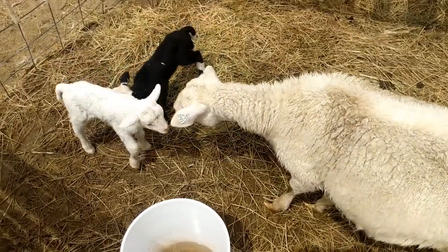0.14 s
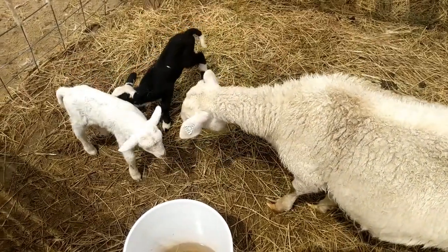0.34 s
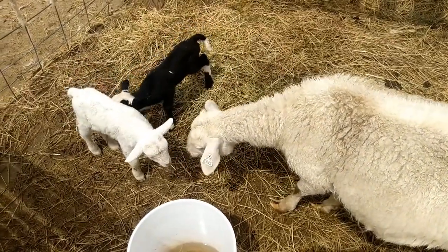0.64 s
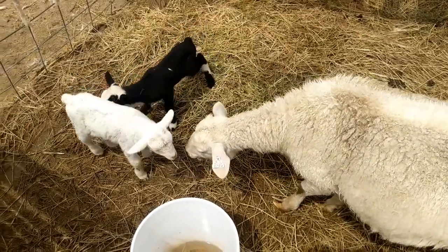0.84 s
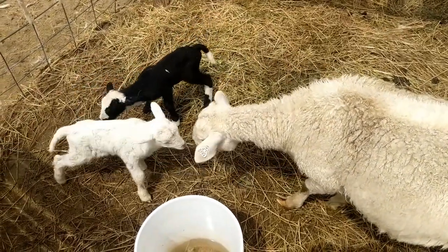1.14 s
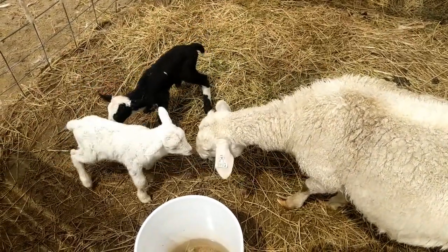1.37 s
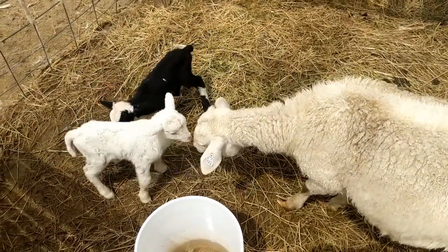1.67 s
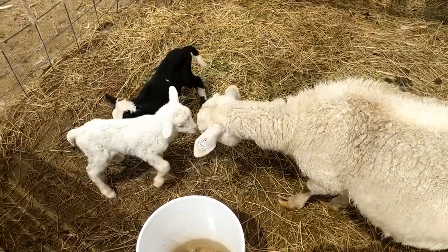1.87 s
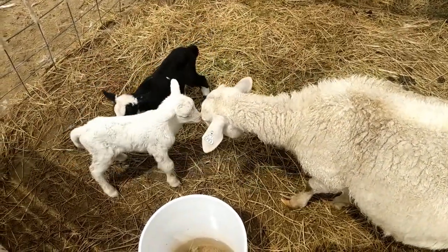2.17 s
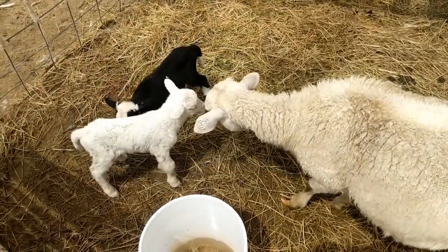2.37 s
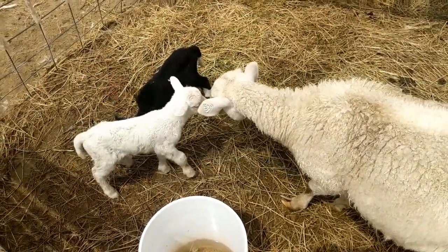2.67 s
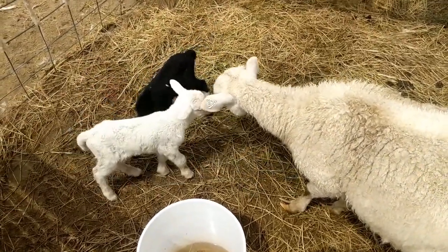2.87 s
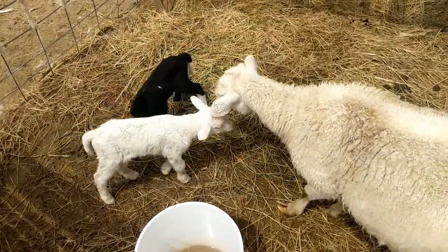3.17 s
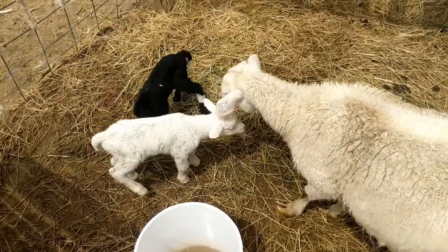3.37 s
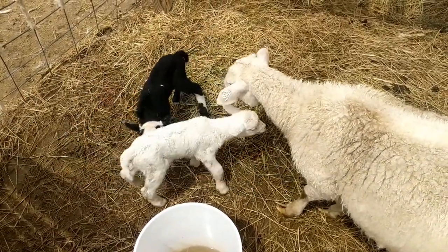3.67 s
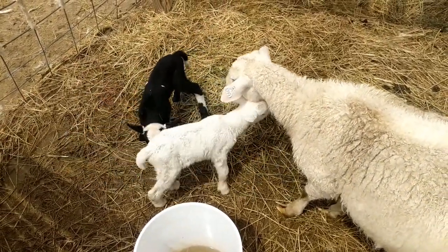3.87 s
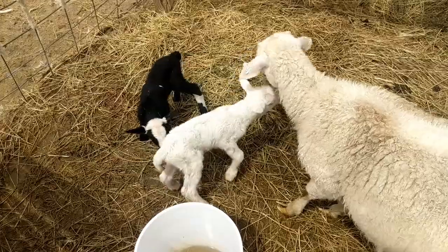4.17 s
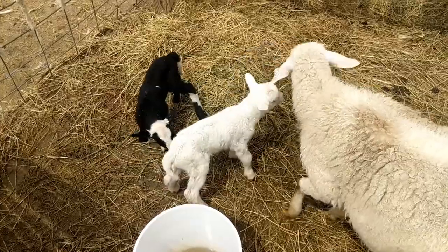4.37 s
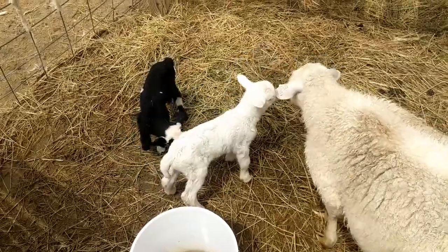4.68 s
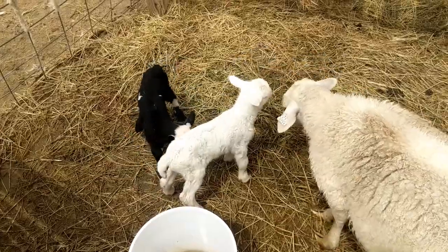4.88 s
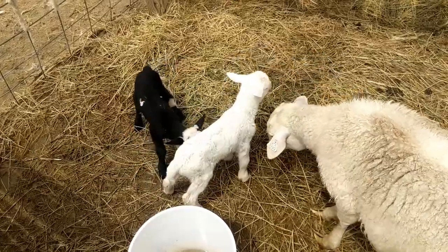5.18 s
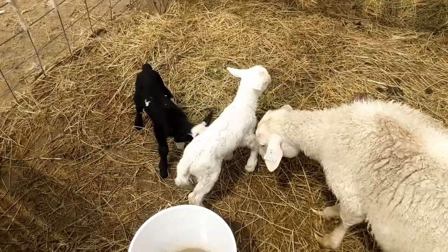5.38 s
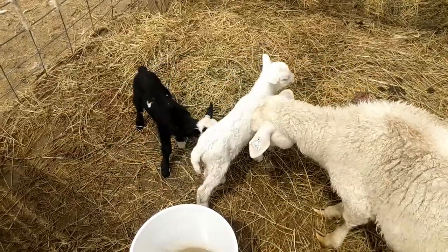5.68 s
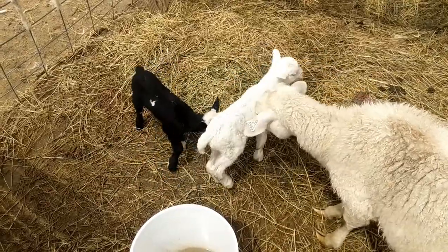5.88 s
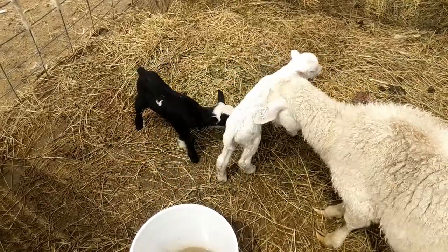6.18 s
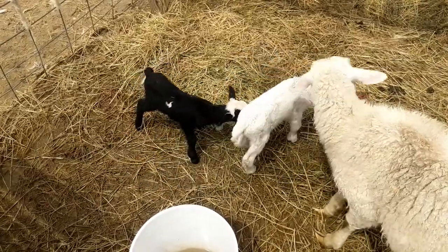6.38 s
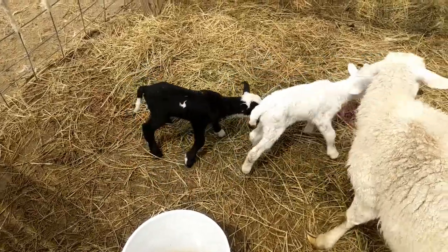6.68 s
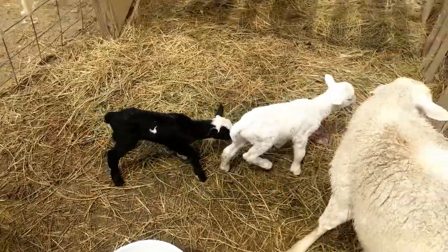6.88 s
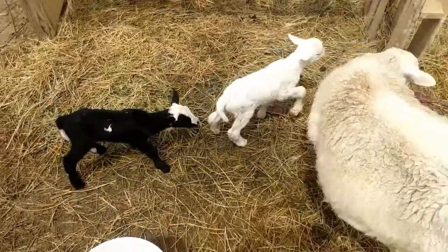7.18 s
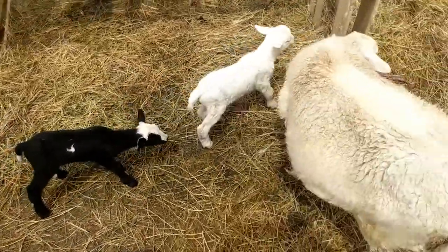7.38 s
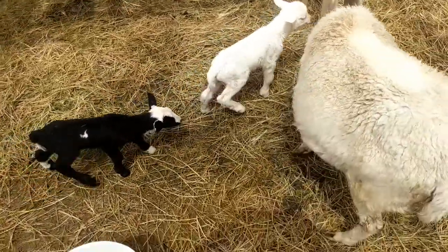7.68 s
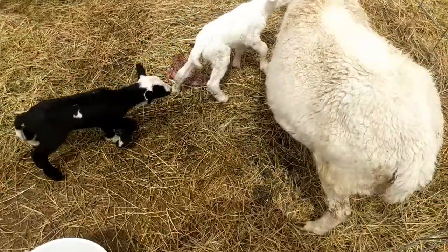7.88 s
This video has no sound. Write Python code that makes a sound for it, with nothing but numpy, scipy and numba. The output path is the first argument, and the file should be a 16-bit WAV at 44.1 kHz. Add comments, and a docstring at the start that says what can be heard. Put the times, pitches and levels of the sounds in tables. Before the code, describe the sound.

Dull wooden bumps and straw snaps, then a hard rattling panel knock, a lamb's thin whine, a ewe's rumble, throbbing bleat and long call.

```python
"""Dull bumps on wood and a faint far bleat, then a pen panel is knocked hard and rattles while straw snaps.
A lamb whines upwards; a ewe rumbles with closed mouth, croaks, gives a throbbing bleat and then a long call.
Wood is ringing modes plus filtered noise; snaps are short noise bursts, a stir and a sniff are noise swells.
Voices are trains of sharp pulses mixed with breath, shaped by the resonances of throat, mouth and nose.
Soft barn air, the fine crackle of bedding and short echoes surround it all."""
import sys
import numpy as np
from scipy import signal
from scipy.fft import rfft, irfft, next_fast_len
from scipy.io import wavfile
from scipy.ndimage import uniform_filter1d
from numba import njit

SR = 44100
rng = np.random.default_rng(int(sys.argv[2]) if len(sys.argv) > 2 else 0)


def generate_wav(signal):
    """Clip the signal to [-1, 1] and save it as 16-bit WAV at the path in sys.argv[1]."""
    frames = np.transpose(np.atleast_2d(signal))
    scaled = np.clip(frames, -1, 1) * 32767
    pcm = np.round(scaled).astype(np.int16)
    wavfile.write(sys.argv[1], SR, pcm)


N = 354123
TIME = np.arange(N) / SR
CUTOFF_HZ = 16000   # top of the voices' harmonics and of the whole sound
WANDER = 0.022   # basic share by which high resonances wander

# tone colour of a dull thud on wood: (frequency [Hz], level [dB])
THUD_COLOUR = [(50, -22), (95, -1.5), (170, 4), (300, 3), (420, -4), (650, -7), (1000, -15.5), (2500, -60)]
# tone colour of wood clattering: (frequency [Hz], level [dB])
CLATTER_COLOUR = [(250, -61), (500, 11), (750, 6.5), (1300, 10), (1800, 0), (2300, -7.5), (3200, -18.5),
                  (7000, -19), (15000, -53)]
# tone colour of a sharp crack, of wood or straw: (frequency [Hz], level [dB])
CRACK_COLOUR = [(1000, 6), (2500, 10.5), (4000, 0), (5300, 4), (7600, 4), (9000, -6), (12000, -4),
                (15500, -16)]


def from_db(db):
    """Turn decibels into a plain multiplier."""
    return 10 ** (np.asarray(db) / 20)


def rms_one(x):
    """Scale a sound to an average strength (rms) of 1."""
    return x / np.sqrt(np.mean(x ** 2) + 1e-20)


def in_time(rows):
    """Draw each column of a table that starts with times as a curve over every sample."""
    times, *columns = np.transpose(rows)
    return [np.interp(TIME, times, column) for column in columns]


def swell(start, end, attack, release, db):
    """A level that rises, holds and falls in straight lines."""
    return from_db(db) * np.clip(np.minimum((TIME - start) / attack, (end - TIME) / release), 0, 1)


def sounding(rows):
    """One while a table of times lasts, with short fades."""
    return swell(rows[0][0] - .01, rows[-1][0] + .01, .01, .01, 0)


def filtered(x, order, hz, kind="low"):
    """Let through only the part below, above or between the given frequencies."""
    return signal.sosfilt(signal.butter(order, hz, kind, fs=SR, output="sos"), x)


def colour(x, spectrum):
    """Filter a sound by a (frequency [Hz], level [dB]) table, then set its rms to 1."""
    hz, db = np.transpose(spectrum)
    size = next_fast_len(N + 4096)
    bins = np.maximum(np.fft.rfftfreq(size, 1 / SR), 1)
    # beyond both ends of the table the level keeps falling
    outside = np.minimum(bins / hz[0], 1) ** 2 * np.minimum(hz[-1] / bins, 1) ** 2
    gain = outside * from_db(np.interp(np.log(bins), np.log(hz), db))
    return rms_one(irfft(rfft(x, size) * gain, size)[:N])


def noise(spectrum):
    """Random hiss with a given tone colour."""
    return colour(rng.standard_normal(N), spectrum)


def drift(rate):
    """A wandering random curve with rms 1 and `rate` new random points a second."""
    points = rng.standard_normal(N // 16)
    return rms_one(np.interp(TIME * rate, np.arange(len(points)), points))


def even(x):
    """Hold the short-term rms near 1, so that a level curve can then shape the sound."""
    power = uniform_filter1d(uniform_filter1d(x * x, size=660), size=660)
    return x / np.sqrt(np.abs(power) + 1e-14)


@njit
def sweep(x, w, r):
    """Two-pole resonance with a moving centre, gain about 1 on top."""
    y = np.zeros(len(x))
    for i in range(2, len(x)):
        drive = (1 - r * r) / 2 * (x[i] - x[i - 2])
        y[i] = drive + 2 * r * np.cos(w[i]) * y[i - 1] - r * r * y[i - 2]
    return y


def resonance(x, hz, width_hz, db=0):
    """A steep-sided resonance: the same pole pair twice."""
    w = 2 * np.pi * hz / SR * np.ones(N)
    r = np.exp(-np.pi * width_hz / SR)
    return from_db(db) * sweep(sweep(x, w, r), w, r)


def resonances(x, modes):
    """Add up fixed resonances, given as (frequency [Hz], width [Hz], level [dB])."""
    return sum(resonance(x, *mode) for mode in modes)


def larynx(pitch, jitter, breath):
    """Vocal folds: one sharp pulse a cycle, uneven in time, with a puff of air in each cycle."""
    phase = 2 * np.pi * np.cumsum(pitch * (1 + jitter * drift(220))) / SR
    harmonics = np.floor(CUTOFF_HZ / np.max(pitch))
    # this ratio of sines adds up equally strong harmonics
    pulses = rms_one(np.sin((harmonics + .5) * phase) / (np.sin(phase / 2) + 1e-12) - 1)
    puffs = rms_one(rng.standard_normal(N) * (1 + np.cos(phase - 1)) ** 2)
    return pulses + breath * puffs


def smeared(x):
    """Scattering close by spreads each pulse over a few milliseconds without colouring it."""
    for delay_s in (.00043, .00077, .00131):
        loop = np.zeros(round(delay_s * SR) + 1)
        loop[0], loop[-1] = 1, -.55
        x = signal.lfilter(loop[::-1], loop, x)
    return x


def throbs(rows, rise, fall, lag=0):
    """Surges of effort (time, dB, optional stretch), each with a rounded top between two flanks."""
    power = 0
    for s, db, *length in rows:
        age = np.clip((TIME - s - lag) / np.prod(length), -.2, .2)
        surge = 2 * from_db(db) / (np.exp(-age / rise) + np.exp(age / fall))
        power = power + surge ** 2
    return np.sqrt(power)


def decays(times, levels_db, t60s, rise=.0004):
    """Level curve of blows that swell at once and die away; t60 is the time to fall by 60 dB."""
    power = np.zeros(N)
    for s, db, t60 in np.broadcast(times, levels_db, t60s):
        at = round(s * SR)
        age = TIME[:min(SR // 2, N - at)]
        power[at:at + len(age)] += (from_db(db - 60 * age / t60) * (1 - np.exp(-age / rise))) ** 2
    return np.sqrt(power)


def ring(times, levels_db, hz, t60):
    """Blows set one mode ringing; a high-pass removes any steady push."""
    clicks = np.full(N, 1e-18)
    clicks[np.round(times * SR).astype(int)] = from_db(levels_db)
    r, w = from_db(-60 / (t60 * SR)), 2 * np.pi * hz / SR
    swing = signal.lfilter([0, np.sin(w)], [1, -2 * r * np.cos(w), r * r], clicks)
    return filtered(swing, 2, hz / 2, "high")


def clacks(times, levels_db, pitches, t60):
    """Short hollow bursts, each at the pitch of the spot that was struck."""
    width_hz = 400
    out, age = np.zeros(N), TIME[:SR // 4]
    for at, db, hz in zip(np.round(times * SR).astype(int), levels_db, pitches):
        band = [max(hz - width_hz / 2, 100), hz + width_hz / 2]
        burst = rms_one(filtered(rng.standard_normal(len(age)), 2, band, "band"))
        out[at:at + len(age)] += burst * from_db(db - 60 * age / t60)
    return out


def background():
    """Low barn air and the fine crackle of trodden bedding, made of random decaying grains of noise."""
    # tone colour of the barn air: (frequency [Hz], level [dB])
    air_colour = [(25, -7), (112, 3), (288, 0.5), (505, -4.5), (1200, -8), (3000, -17), (3900, -19),
                  (6600, -120)]
    # tone colour of the straw bedding: (frequency [Hz], level [dB])
    straw_colour = [(1200, 2), (2800, 1), (4200, 4), (5400, 6.5), (6300, 2.5), (7600, 7), (8600, -1.5),
                    (11000, 0.5), (15800, -3)]
    # how much the animals stir the bedding: (time [s], level [dB])
    stirring = [(0, -63.5), (2.0, -66), (2.6, -68.5), (4.5, -66.5), (6.85, -65), (7.1, -59.5),
                (8.03, -61.5)]
    air_db, grains_per_s, grain_fade_s = -60.5, 50, 0.0053
    straw_db, = in_time(stirring)
    grain_level = from_db(4.5 * np.minimum(rng.exponential(1, N), 2.3))
    grains = (rng.random(N) < grains_per_s / SR) * grain_level
    fading = signal.lfilter([1], [1, -np.exp(-1 / (grain_fade_s * SR))], grains)
    crackle = rms_one(fading) * noise(straw_colour)
    air = noise(air_colour) * from_db(air_db + drift(25))
    return air + from_db(straw_db) * (noise(straw_colour) + crackle * from_db(-4.0))


def barn(x):
    """Scattered reflections, soon soaked up by the hay: fading noise as an echo pattern."""
    t60_s = 0.25
    age = TIME[:SR // 2]
    echoes = rng.standard_normal(len(age)) * from_db(-60 * age / t60_s) * (age > .008)
    return signal.fftconvolve(x, echoes / np.sqrt(np.sum(echoes ** 2)))[:N]


def far_bleat():
    """A faint high bleat from further off: a breathy voice in four evenly spaced quavers."""
    # its tone colour: (frequency [Hz], level [dB])
    far_colour = [(500, 7), (630, 4.5), (1260, -4.5), (1900, -14), (2700, -15), (3700, -7), (5200, -11),
                  (7000, -50)]
    start_s, gap_s, level_db = 1.572, 0.103, -54
    source = larynx(625 * (1 + .025 * drift(25)), jitter=.035, breath=.8)
    quavers = [(start_s + k * gap_s, level_db) for k in range(4)]
    return colour(source, far_colour) * throbs(quavers, rise=0.031, fall=0.0075)


def soft_noises():
    """A faint far-off stir, a rustle and a breathy sniff: swells of flickering noise."""
    # first the stir, then the rustle, then the sniff:
    # (start [s], end [s], attack [s], release [s], level [dB])
    swells = [(1.3, 2.5, 0.76, 0.33, -62), (5.949, 6.63, 0.021, 0.13, -51.5),
              (6.608, 6.804, 0.096, 0.12, -46)]
    # tone colour they share: (frequency [Hz], level [dB])
    soft_colour = [(150, -35), (250, -5), (359, -3.5), (1070, -6.5), (1850, -2.5), (2620, -11), (7380, -10),
                   (8770, -21.5), (15500, -22.5)]
    flicker = from_db(2 * drift(330) + 2 * drift(60))
    return noise(soft_colour) * sum(swell(*row) for row in swells) * flicker


def snaps():
    """Bright splintering bursts of noise: straw stalks snap, and one sharp crack comes as the panel rattles."""
    # snapping stalks, and at 3.725 s the sharp crack as the panel rattles:
    # (time [s], level [dB], pitch that sets the band [Hz], length [s])
    snap_rows = [(0.055, -20.5, 3700, 0.008), (0.389, -23.5, 7100, 0.03), (1.089, -33.5, 6040, 0.064),
                 (1.1233, -14.5, 8500, 0.039), (1.15, -19, 7600, 0.021), (1.2426, -32.5, 6740, 0.084),
                 (1.526, -31.5, 5270, 0.054), (2.924, -14.5, 6950, 0.03), (3.725, -25.5, 5830, 0.064),
                 (4.026, -29.5, 5370, 0.061), (4.094, -38, 5440, 0.049), (4.549, -28, 4330, 0.018),
                 (4.925, -27.5, 7540, 0.019), (5.996, -31, 6700, 0.022), (6.448, -25, 6760, 0.077),
                 (6.589, -27, 6800, 0.029), (6.713, -24.5, 7000, 0.035), (7.072, -35, 2060, 0.017),
                 (7.2031, -20.5, 6400, 0.0056), (7.262, -33, 7050, 0.14), (7.351, -33.5, 4370, 0.11),
                 (7.857, -20.5, 7380, 0.02)]
    s, snap_db, pitches, lengths = np.transpose(snap_rows)
    splinters = noise(CRACK_COLOUR) * from_db(2 * drift(2500))
    out = np.zeros(N)
    for at, db, hz, length in zip(np.round(s * SR).astype(int), snap_db, pitches, lengths):
        age = TIME[:min(SR // 4, N - at)]
        envelope = from_db(db - 4 - 60 * age / length) * (1 - np.exp(-age / (0.068 * length)))
        burst = splinters[at:at + len(age)] * envelope
        out[at:at + len(age)] += filtered(burst, 2, [hz * 0.91, min(hz * 1.8, 15000)], "band")
    return out


def bounces(count):
    """After the hardest bump the board bounces evenly, each time more weakly; rows like the bumps."""
    start_s, gap_s, t60_s = 1.322, 0.05, 0.18
    thud_db, thud_loss_db, clatter_db, clatter_loss_db = -30.5, 8.5, -35.5, 5
    return [(start_s + k * gap_s, thud_db - k * thud_loss_db, clatter_db - k * clatter_loss_db, t60_s)
            for k in range(count)]


def bumps():
    """Knocks ring a board's modes and make dull noise; light taps, soft footfalls and scuffs join in."""
    # dull bumps on wood: (time [s], thud level [dB], clatter level [dB], thud decay by 60 dB [s])
    bump_rows = [(0.052, -49.5, -54, 0.05), (0.535, -49, -65, 0.071), (0.657, -47.5, -68, 0.23),
                 (0.745, -42, -50, 0.11), (0.793, -53, -47.5, 0.13), (0.828, -47, -54, 0.068),
                 (0.911, -43, -60, 0.036), (0.995, -58, -53, 0.074), (1.293, -22, -37, 0.066),
                 (1.298, -26, -36, 0.3), (1.718, -35.5, -41, 0.16), (2.676, -47, -51, 0.032),
                 (3.396, -52, -44, 0.2), (4.265, -55.5, -53, 0.18)]
    # modes of the knocked board: (frequency [Hz], level [dB], decay by 60 dB [s])
    board_modes = [(88.7, -18.5, 0.6), (147, 4, 0.069), (256.6, -2.5, 0.21), (305, 6, 0.062),
                   (375.5, -7, 0.24), (513, -9.5, 0.14), (630, -19, 0.026)]
    # soft footfalls: (time [s], level [dB])
    footfalls = [(2.274, -33), (2.3, -34)]
    # a body scuffing along the panel: (start [s], end [s], attack [s], release [s], level [dB])
    scuffs = [(0.394, 0.604, 0.12, 0.072, -49), (0.554, 0.796, 0.077, 0.03, -51.5),
              (0.781, 0.971, 0.012, 0.056, -47), (3.247, 4.11, 0.44, 0.38, -47)]
    # tone colour of the scuffing: (frequency [Hz], level [dB])
    scuff_colour = [(60, -48), (103, 10.5), (173, -6), (356, 3), (445, -15), (572, 1.5), (691, -14),
                    (809, -9.5), (933, -13), (1590, -12.5), (1930, -23), (2600, -26), (3380, -57)]
    # light hollow taps on the pen: (time [s], level [dB], pitch [Hz])
    taps = [(0.619, -54, 1600), (0.748, -38.5, 644), (0.911, -44.5, 600), (0.995, -46.5, 1360),
            (3.535, -41, 1180), (3.936, -48, 1530), (3.958, -46, 1090), (4.267, -53, 1010),
            (4.382, -57, 2000)]
    s, thud_db, clatter_db, t60 = np.transpose(list(bump_rows) + bounces(count=5))
    # neighbouring modes start in opposite directions
    board = sum((-1) ** k * ring(s, thud_db + db - 2.0, hz, decay)
                for k, (hz, db, decay) in enumerate(board_modes))
    thud = noise(THUD_COLOUR) * decays(s, thud_db - 4.0, t60)
    clatter = noise(CLATTER_COLOUR) * decays(s, clatter_db + 3.5, t60 * 0.63)
    step_s, step_db = np.transpose(footfalls)
    steps = resonance(ring(step_s, step_db, 96.5, 0.33), 112, 120)
    scuff = noise(scuff_colour) * sum(swell(*row) for row in scuffs) * from_db(2.2 * drift(80))
    return board + thud + clatter + steps + scuff + clacks(*np.transpose(taps), t60=0.066)


def panel():
    """The panel booms in its modes and clatters against its fastening until held; hard blows crack."""
    # a nudge, then the knock with its rattle:
    # (time [s], boom level [dB], clatter level [dB], pitch of the clack [Hz])
    bangs = [(3.497, -25, -34.5, 1230), (3.628, -15, -20, 1160), (3.638, -21.5, -21, 790),
             (3.648, -41, -29, 950), (3.697, -25, -26, 1430), (3.724, -24, -29, 1670),
             (3.754, -24, -30, 1350), (3.802, -24.5, -35, 740), (3.827, -30.5, -35.5, 686),
             (3.863, -25.5, -36.5, 1020)]
    # modes of the panel: (frequency [Hz], level [dB], decay by 60 dB [s])
    panel_modes = [(124.46, 3.5, 0.84), (181.2, -1, 0.85), (279, -3, 0.12), (369, -4, 0.42),
                   (519, -1, 0.28), (637, -22, 0.41), (753, -0.5, 0.11), (1013, -11, 0.35),
                   (1160, -12, 0.32), (1300, -18, 0.15)]
    crack_below_db = -17   # crack against the strongest clatter, before the trims below
    crack_growth = 0.77   # dB of crack per dB of clatter
    s, boom_db, clatter_db, clack_hz = np.transpose(bangs)
    strongest_db = clatter_db.max()
    crack_db = strongest_db + crack_below_db + crack_growth * (clatter_db - strongest_db)
    # every blow excites each mode by a different random amount
    boom = sum(ring(s, boom_db + db - 12.5 + rng.normal(0, 4.1, len(s)), hz, t60)
               for hz, db, t60 in panel_modes)
    thud = noise(THUD_COLOUR) * decays(s, boom_db - 2.0, 0.11)
    clatter = noise(CLATTER_COLOUR) * decays(s, clatter_db - 2.5, 0.17) * from_db(3.3 * drift(350))
    crack = noise(CRACK_COLOUR) * (decays(s, crack_db - 1.5, 0.043) + decays(s, crack_db - 9.0, 0.33))
    clack = clacks(s, clatter_db - 6.5, clack_hz, t60=0.13)
    # a thin panel radiates little below its lowest mode
    body = filtered(boom + thud + clatter + clack, 4, 90, "high")
    held_db = np.interp(TIME, [3.87, 3.96], [0, -14])
    return body * from_db(held_db) + crack


def whine():
    """A lamb's thin note glides steadily up: first mostly a hum, then more overtones through the nose."""
    # strength of the whine: (time [s], hum level [dB], overtone level [dB])
    strength = [(4.73, -65, -74), (4.81, -56, -69), (4.88, -52.5, -61), (4.915, -59, -62),
                (5.0, -56.5, -59), (5.05, -58, -64), (5.2, -61, -65)]
    # fixed resonances of the lamb's nose: (frequency [Hz], width [Hz], level [dB])
    lamb_nose = [(560, 250, -12), (900, 200, -4), (1330, 300, -7)]
    start_s, end_s, start_hz, rise_hz_per_s = 4.73, 5.2, 193, 425
    pitch = start_hz + rise_hz_per_s * (np.clip(TIME, start_s, end_s) - start_s)
    source = larynx(pitch, jitter=.014, breath=.12)
    hum_db, overtones_db = in_time(strength)
    hum = even(resonance(source, pitch, 120)) * from_db(hum_db)
    nose = even(resonances(source, lamb_nose)) * from_db(overtones_db)
    return (hum + nose) * from_db(1.5 * drift(45)) * sounding(strength)


def rumble():
    """The ewe's closed-mouth call: uneven throbs sound the nose, over a held tone, a creak and a rasp."""
    # voice of the rumble: (time [s], pitch [Hz], creak level [dB])
    rumble_voice = [(5.145, 80.03, -58), (5.165, 85.9, -59), (5.235, 90.6, -55), (5.285, 95, -63),
                    (5.34, 104.8, -57), (5.39, 150.4, -62), (5.551, 160.1, -58), (5.64, 160.2, -60),
                    (5.72, 118.2, -59), (5.751, 89.6, -74)]
    # its surges of effort: (time [s], level [dB])
    surges = [(5.235, -42.5), (5.259, -51), (5.305, -39.5), (5.334, -45.5), (5.37, -44.5), (5.428, -43),
              (5.484, -44), (5.54, -48.5), (5.575, -51), (5.627, -52), (5.688, -49.5), (5.712, -43)]
    # fixed resonances of the ewe's nose: (frequency [Hz], width [Hz], level [dB])
    ewe_nose = [(200, 150, 1), (310, 120, -3), (620, 300, -16), (1050, 140, -3.5)]
    # resonances of the rasp: (frequency [Hz], width [Hz], level [dB])
    rasp_modes = [(5550, 390, -6), (6190, 340, 1), (7500, 1000, -9)]
    start_s, end_s, tone_db, rasp_db = 5.234, 5.755, -56.5, -58
    creak_hz, creak_sag_hz_per_s2 = 2410, 1700   # the creak's resonance sinks ever faster
    sink_hz, sink_hz_per_s = 1950, 700   # the one below it sinks steadily
    quavers_per_s, quaver_peak_s, quaver_swing_db = 16.5, 5.478, 4
    pitch, creak_db = in_time(rumble_voice)
    first_s, last_s = rumble_voice[0][0], rumble_voice[-1][0]
    age = np.clip(TIME, first_s, last_s) - first_s
    jitter = np.interp(pitch, [85, 160], [.24, .2])
    breath = np.interp(pitch, [90, 150], [.1, .45])
    pulses = larynx(pitch, jitter, breath)
    source = smeared(pulses)
    tone = swell(start_s, end_s, .05, .03, tone_db) * from_db(3 * drift(90))
    effort = np.hypot(throbs(surges, rise=0.006, fall=0.0065), tone)
    nose = even(resonances(source, ewe_nose)) * effort
    # the upper resonances quaver in level
    quaver = np.cos(2 * np.pi * quavers_per_s * (TIME - quaver_peak_s) + .4 * drift(8))
    flutter = from_db(quaver_swing_db * quaver)
    sinking_hz = (sink_hz - sink_hz_per_s * age) * (1 + WANDER * drift(40))
    sinking_level = np.hypot(effort * from_db(-9), flutter * swell(5.34, 5.69, 0.06, 0.034, -58.5))
    sinking = even(resonance(source, sinking_hz, 310)) * sinking_level
    hum = even(resonance(source, 237.0, 59)) * tone * from_db(-5.0)
    hum = hum + even(resonance(source, 156, 87)) * effort * from_db(-12.5)
    # the creak catches once, sharply
    catch = throbs([(5.259, -48)], rise=0.0017, fall=0.003)
    creak_level = from_db(creak_db + 3.5 * drift(80)) * np.sqrt(flutter) + catch
    creak = even(resonance(pulses, creak_hz - creak_sag_hz_per_s2 * age ** 2, 450)) * creak_level
    low = filtered(nose + sinking + hum + creak * sounding(rumble_voice), 8, 2800)
    rasp = even(sum(resonance(pulses, hz * (1 + WANDER / 2 * drift(30)), width, db)
                    for hz, width, db in rasp_modes))
    return low + rasp * flutter * swell(first_s, end_s, 0.35, 0.19, rasp_db)


def croak():
    """A few dry, hollow rattles deep in the throat; the main resonance moves from one to the next."""
    # rattles that end the rumble: (time [s], level [dB], main resonance [Hz])
    rattles = [(5.781, -44.5, 1600), (5.798, -44, 1340), (5.827, -42.5, 1560), (5.852, -39.5, 1246),
               (5.884, -48.5, 1350)]
    # fixed resonances of the throat: (frequency [Hz], width [Hz], level [dB])
    throat_modes = [(243, 123, 3), (537, 134, -5.5), (875, 220, -5), (1630, 120, -5), (1856, 370, -10)]
    s, db, hz = np.transpose(rattles)
    source = smeared(larynx(133.5, jitter=.12, breath=.5))
    main = resonance(source, np.interp(TIME, s, hz), 280, db=2)
    # the signs alternate from one resonance to the next
    others = sum((-1) ** k * resonance(source, *mode) for k, mode in enumerate(throat_modes))
    return even(main + others) * throbs(zip(s, db), rise=0.003, fall=0.0066)


def slides(source):
    """Short swells of the bleat's top resonance, most of them sliding down in pitch."""
    # the slides: (start [s], starting frequency [Hz], level [dB])
    slide_rows = [(6.045, 3230, -47), (6.11, 2880, -43), (6.174, 2690, -40), (6.245, 2500, -44),
                  (6.385, 3116, -48)]
    length_s, end_hz, width_hz = 0.06, 2500, 260
    s, start_hz, db = np.transpose(slide_rows)
    latest = np.maximum(np.searchsorted(s, TIME) - 1, 0)
    progress = np.clip(TIME - s[latest], 0, length_s) / length_s
    hz = end_hz + (start_hz[latest] - end_hz) * (1 - progress)
    level = from_db(db[latest]) * np.sqrt(np.abs(np.sin(np.pi * progress)))
    return even(resonance(source, hz, width_hz)) * level


def bleat():
    """The mouth opens and closes over a voice that starts as a rasp and surges in uneven throbs."""
    # voice and mouth: (time [s], pitch before bending [Hz], mouth opening [0-1])
    bleat_voice = [(6.005, 135, 0.34), (6.07, 130, 0.69), (6.16, 132.5, 0.82), (6.295, 143.9, 0.95),
                   (6.436, 129.5, 0.77), (6.49, 109, 0.08)]
    # three mouth resonances before the shifts below: (frequency shut [Hz], frequency open [Hz])
    mouth_range = [(320, 613), (1520, 1844), (2150, 2083)]
    # throbs: (time [s], upper resonance level [dB], first resonance level [dB], relative length [1])
    surges = [(6.006, -31, -34.5, 0.36), (6.027, -26, -31, 0.67), (6.065, -36.5, -33, 0.84),
              (6.088, -29.5, -41.5, 0.96), (6.136, -34, -40, 0.55), (6.155, -20, -28.5, 0.57),
              (6.228, -20, -29.5, 0.97), (6.293, -18.5, -28.5, 0.99), (6.367, -24, -28, 1.06),
              (6.437, -28, -29, 1.13), (6.465, -35.5, -36, 0.95)]
    # roughness: (time [s], share by which the pitch jitters [1], air against pulses [1])
    roughness = [(6.08, .1, 1.0), (6.15, .025, .3), (6.32, .02, .25), (6.44, .035, .4)]
    # highest resonance: (time [s], frequency [Hz])
    high_curve = [(6.07, 7200), (6.12, 5600), (6.3, 5780), (6.37, 6270), (6.425, 6130), (6.455, 7750)]
    # tone colour of the buzz: (frequency [Hz], level [dB])
    buzz_colour = [(2500, -1), (3300, 20), (3750, 20.5), (4250, 18.5), (4750, 20.5), (5200, 19.5),
                   (6600, 14), (7500, 15.5), (8500, -1), (15000, -7)]
    rise_s, fall_s = 0.012, 0.0068   # flanks of a throb of relative length 1
    bend_pitch, bend_jaw = 0.11, 0.4   # how strongly pitch and first resonance follow the bend
    pitch, opening = in_time(bleat_voice)
    first, second, third = (shut + opening * (wide - shut) for shut, wide in mouth_range)
    s, upper_db, lower_db, length = np.transpose(surges)
    effort = throbs(zip(s, upper_db, length), rise_s, fall_s)
    depth = throbs(zip(s, lower_db, length), rise_s * 0.69, fall_s, lag=0.0013)
    after = np.interp(TIME - 0.0052, TIME, effort)
    # within each throb pitch and jaw rise as the surge passes
    bend = (after - effort) / (after + effort + 1e-9)
    surge = np.minimum(throbs(zip(s, 0 * s, length), rise_s, fall_s), 1)
    jitter, breath = in_time(roughness)
    source = smeared(larynx(pitch * (1 + bend_pitch * bend), jitter, breath))
    # two narrow resonances on a broad skirt; the third resonance dips with each surge
    upper = (resonance(source, second * (1.015 + .012 * drift(130)), 165)
             + resonance(source, third * (1.15 - 0.087 * surge), 210, db=-5)
             + resonance(source, second * 1.012 * (1 + 2 * WANDER * drift(130)), 480, db=-8))
    lower = resonance(source, first * (1.007 + bend_jaw * bend), 220)
    lower = lower + resonance(source, 104, 64, db=-11.0)
    # after each surge the first resonance sings on, narrow and clear
    late_depth = np.interp(TIME - 0.015, TIME, depth)
    sung = even(resonance(source, first * 1.1, 40)) * late_depth * from_db(-2) * opening ** 3
    voice = even(upper) * effort * from_db(-0.5) + even(lower) * depth + sung + slides(source)
    high_hz, = in_time(high_curve)
    airy = source + .3 * rng.standard_normal(N)
    buzz = colour(airy, buzz_colour) + resonance(airy, high_hz * (1 + WANDER * drift(60)), 600, db=7)
    # the power below 1 makes the buzz swing less than the effort
    buzz_level = effort ** 0.61 * from_db(-28.0 + 1.7 * drift(160))
    return (voice + even(buzz) * buzz_level) * sounding(bleat_voice)


def long_call():
    """It starts hoarse and broad, narrows to a nasal hum, then opens wide; effort brightens it."""
    # voice of the call: (time [s], pitch [Hz], effort level [dB])
    call_voice = [(7.22, 145.3, -62), (7.29, 149, -61), (7.36, 155.4, -53), (7.45, 177.2, -50),
                  (7.52, 194.8, -45), (7.57, 203, -44), (7.61, 191.4, -47.5), (7.645, 197.5, -42.5),
                  (7.69, 197.7, -45), (7.79, 205.4, -31.5), (7.91, 200.4, -31.5), (7.975, 189.4, -32.5),
                  (8.003, 166.4, -41.5), (8.03, 159, -47)]
    # mouth: (time [s], first resonance [Hz], second resonance [Hz], upper against first level [dB])
    mouth_curve = [(7.25, 835, 1770, -6), (7.45, 830, 1886, -0.5), (7.525, 860, 1950, -6),
                   (7.555, 630, 1860, -7), (7.585, 470, 1610, -4), (7.65, 390, 1620, -4.5),
                   (7.72, 490, 1560, -1), (7.79, 590, 1640, -4), (7.87, 698, 1620, 0),
                   (8.0, 664, 1680, -4.5)]
    # fundamental: (time [s], level [dB])
    chest_curve = [(7.22, -70), (7.28, -55.5), (7.39, -44), (7.445, -51.5), (7.5, -47), (7.578, -40.5),
                   (7.608, -53), (7.646, -39.5), (7.716, -52), (7.76, -42.5), (7.92, -46), (8.01, -56)]
    # lower of two moving high resonances: (time [s], frequency [Hz], level [dB])
    edge_curve = [(7.77, 5300, -68), (7.8, 5340, -61), (7.85, 5400, -52), (7.88, 5750, -63),
                  (7.92, 5900, -56), (7.99, 5310, -63)]
    # higher of the two: (time [s], frequency [Hz], level [dB])
    sheen_curve = [(7.78, 7300, -74), (7.825, 7250, -61), (7.88, 7400, -63), (7.905, 7160, -53),
                   (7.95, 6950, -54), (8.0, 7000, -62)]
    # tone colour of the buzz: (frequency [Hz], level [dB])
    buzz_colour = [(2400, -35), (3100, 0.5), (3850, 7), (4150, -5), (4450, 5), (4900, -5), (6000, -6),
                   (6500, -15), (8000, -4), (8600, -11), (11300, -11), (12500, -24), (15000, -35)]
    ordinary_effort_db = -40
    clear_hz, hoarse_hz, least_rough = 194, 160, 0.06   # the voice breaks up as its pitch drops
    shimmer_db, most_jitter, most_breath = 2.5, 0.05, 0.12   # unevenness at full roughness
    flutter_per_s, flutter_db = 72, 3   # ragged bursts at full roughness
    narrows_s, reopens_s = 7.555, 7.76   # meanwhile the call sounds through the nose
    bright_hz, bright_db, bright_growth = 2700, -55, 1.0   # at ordinary effort; dB per dB of effort
    buzz_db, buzz_growth = -60, 1.36   # at ordinary effort; dB per dB of effort
    pitch, effort_db = in_time(call_voice)
    first, second, upper_db = in_time(mouth_curve)
    chest_db, = in_time(chest_curve)
    rough = np.clip((clear_hz - pitch) / (clear_hz - hoarse_hz), least_rough, 1)
    source = larynx(pitch, most_jitter * rough, most_breath * rough)
    source = source * from_db(shimmer_db * rough * drift(160))
    ragged = np.sin(2 * np.pi * flutter_per_s * TIME + drift(30))
    source = source * from_db(flutter_db * rough * ragged)
    # the treble follows the effort a little late
    late_db = np.interp(TIME - 0.02, TIME, effort_db - ordinary_effort_db)
    airy = smeared(source) + .15 * rng.standard_normal(N)
    low = resonance(source, first, 254) + resonance(source, first * 0.63, 135, db=-16.0)
    upper = resonance(source, second, 160) + resonance(source, second * 1.11, 430, db=-7)
    # a broad throat resonance is heard until the mouth narrows
    broad = np.clip((narrows_s + .02 - TIME) / .03, 0, 1)
    throat = even(resonance(source, 520, 520)) * broad * from_db(2.5)
    mouth = (even(low) + throat + even(upper) * from_db(upper_db)) * from_db(effort_db)
    mouth = filtered(mouth, 10, 2350)
    # the top resonance climbs as the mouth reopens
    climbing_hz = np.interp(TIME, [7.7, 7.83], [bright_hz - 330, bright_hz])
    bright_level = from_db(bright_db + bright_growth * late_db) * np.clip((TIME - 7.66) / .03, 0, 1)
    bright = even(resonance(airy, climbing_hz, 430)) * bright_level
    chest = even(resonance(source, pitch, 96)) * from_db(chest_db)
    nasal = even(resonance(airy, 3340, 400)) * swell(narrows_s, reopens_s, 0.086, 0.021, -59.5)
    buzz_level = from_db(buzz_db + buzz_growth * late_db) * np.clip((TIME - 7.66) / .06, 0, 1)
    buzz = even(colour(airy, buzz_colour)) * buzz_level
    for curve in (edge_curve, sheen_curve):
        hz, db = in_time(curve)
        buzz = buzz + even(resonance(airy, hz, 520)) * from_db(db) * sounding(curve)
    return (mouth + bright + chest + nasal + buzz * from_db(2 * drift(90))) * sounding(call_voice)


def scene():
    """Add up all sources; the long call sends more of its sound into the echoes."""
    near = panel() + bumps() + snaps() + soft_noises() + whine() + rumble() + croak() + bleat()
    call = long_call()
    echoes = barn(near * from_db(-23) + call * from_db(-14))
    return (near + call + far_bleat() + echoes + background())[None]


def record(dry):
    """The hardest peaks are rounded and the top is cut steeply."""
    limit = 0.7   # rounded peaks approach this level
    rounded = limit * np.tanh(dry / limit)
    return signal.sosfilt(signal.ellip(10, .1, 80, CUTOFF_HZ, fs=SR, output="sos"), rounded)


dry = scene()
out = record(dry)
generate_wav(out)
```